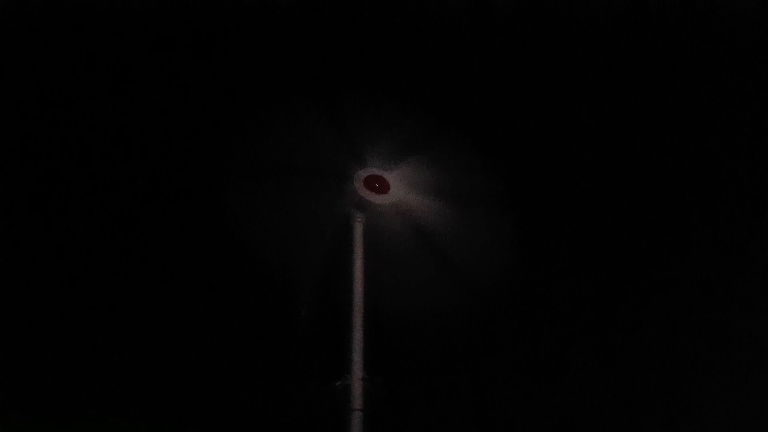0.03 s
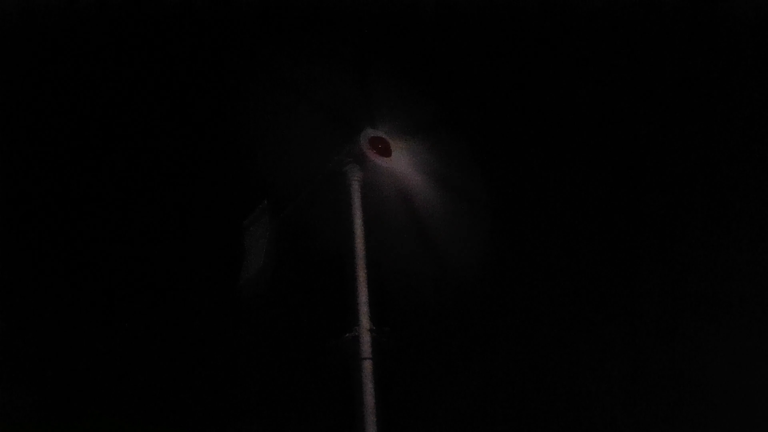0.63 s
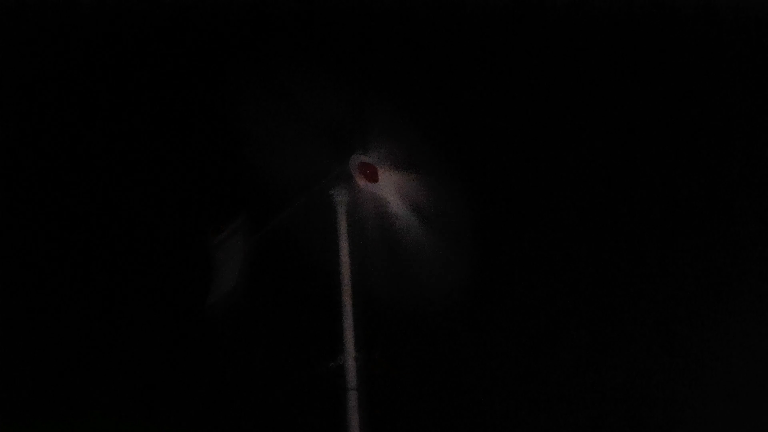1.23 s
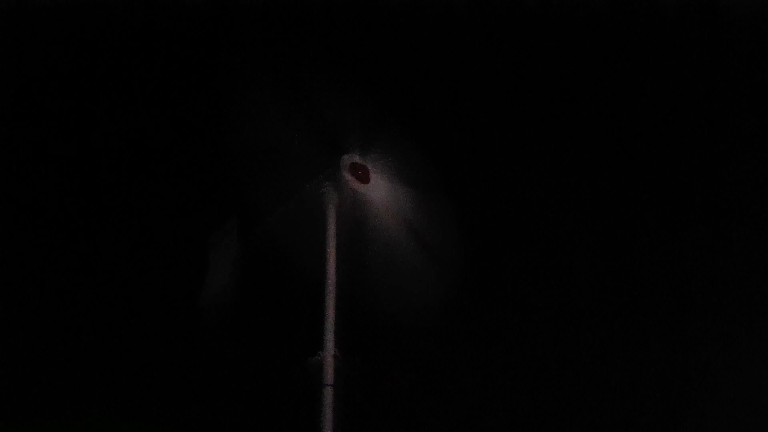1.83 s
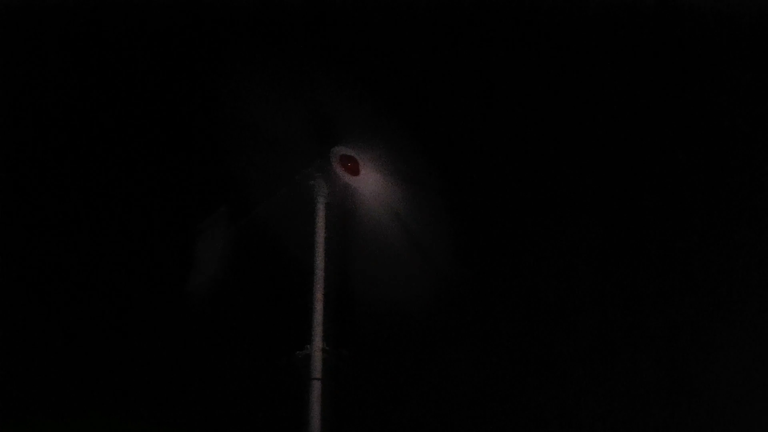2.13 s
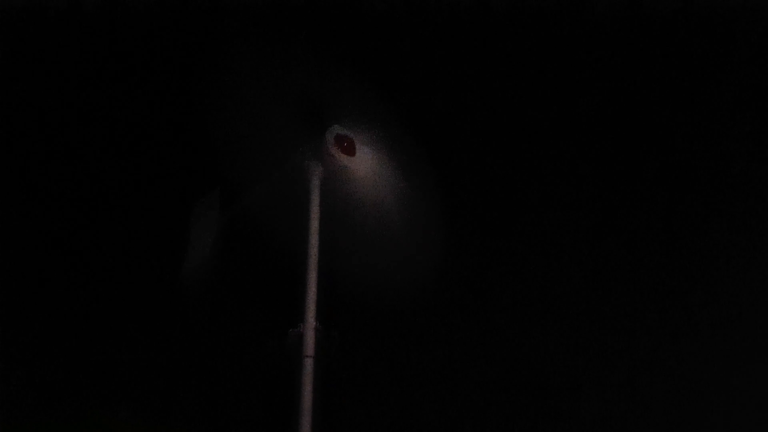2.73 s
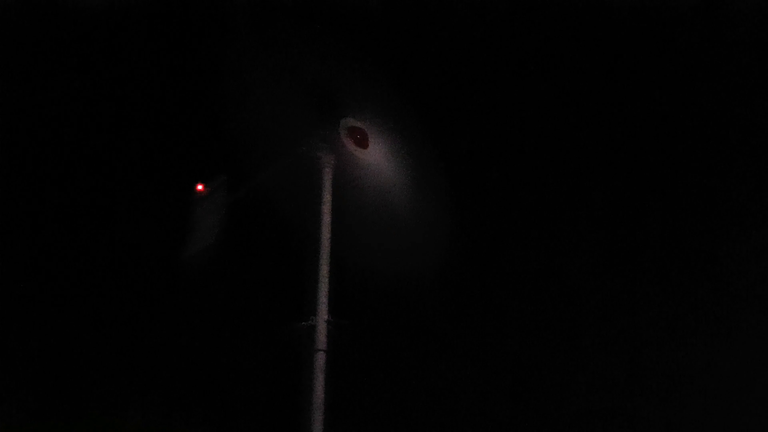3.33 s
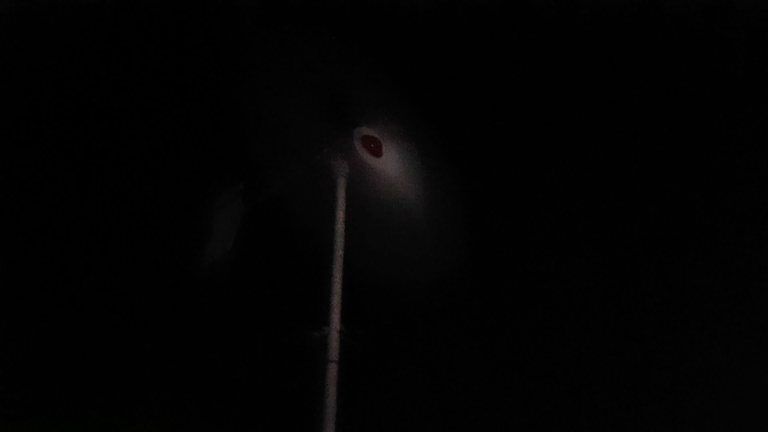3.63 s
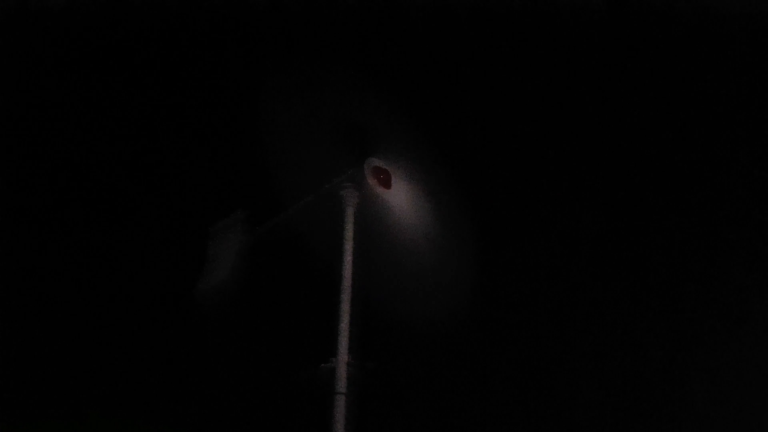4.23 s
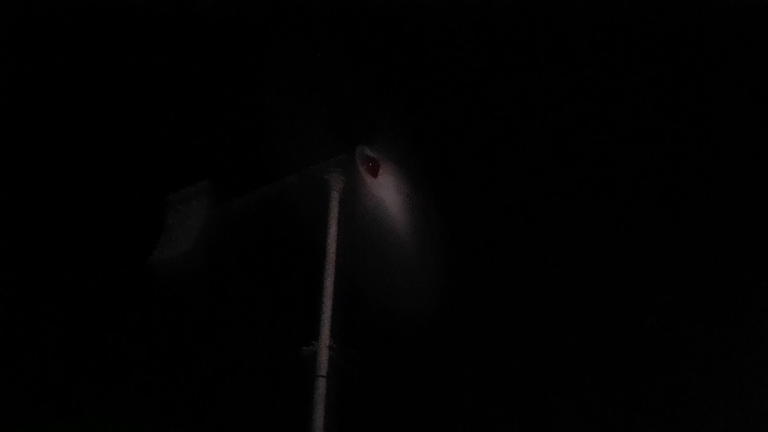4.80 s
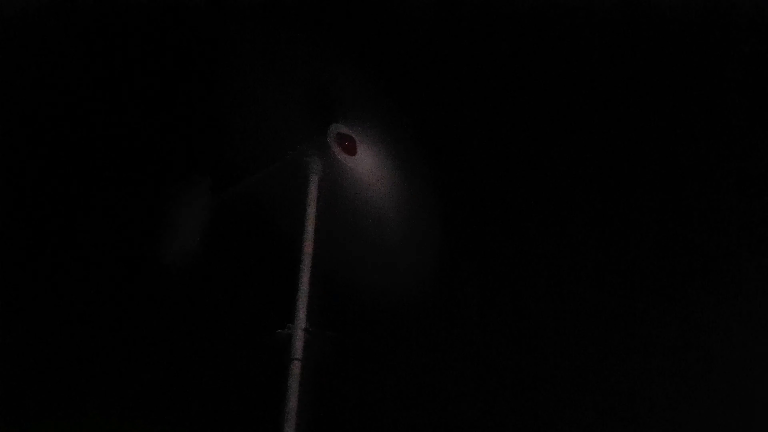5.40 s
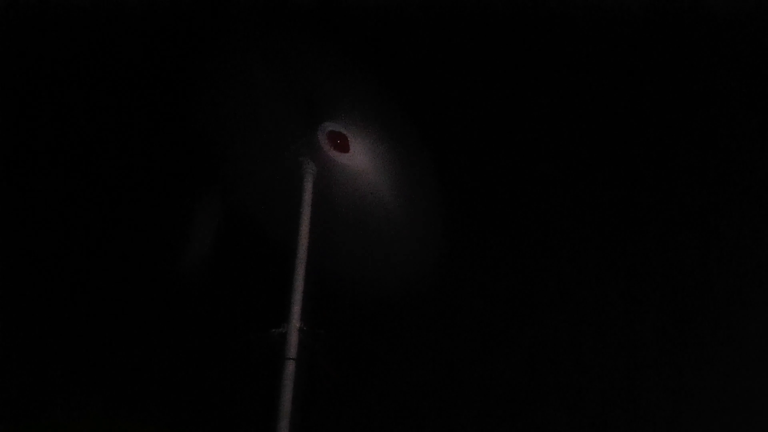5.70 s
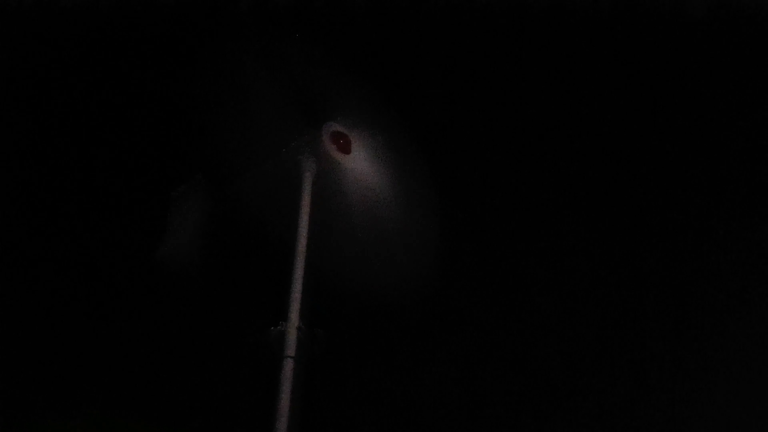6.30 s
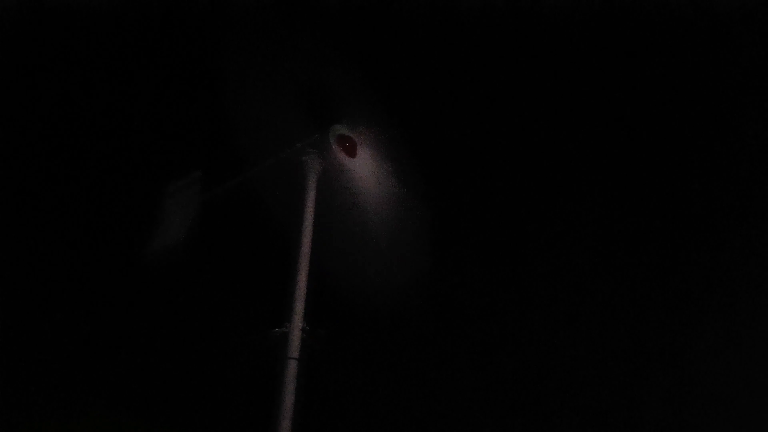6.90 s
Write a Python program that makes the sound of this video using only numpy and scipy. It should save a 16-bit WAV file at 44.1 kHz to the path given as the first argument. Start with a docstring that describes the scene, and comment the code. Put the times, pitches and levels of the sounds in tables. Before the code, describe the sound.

Gusty wind blows straight onto the microphone of a hand-held camera outdoors. It makes an uneven low rumble that flutters and crackles, broken by hollow thumps, sharp slaps and brief lulls, mostly on the right. Fingers rub, tick and bump lightly on the case near the start. The gusts keep coming and are loudest and roughest near the end, over a faint wash of distant wind.

```python
"""Under a street lamp at night, gusty wind blows over the two microphone ports of a hand-held camera.
Eddies (swirls of air) buffet each port on its own, the windward right one harder, and tear into a
crackling flutter when the flow is fast. Sharp eddies slap a port, broad ones thump hollowly, and the
air cracks and rasps at the rim. Wind also washes through the surroundings, and the hand rubs, ticks
and bumps on the case."""
import sys
import numpy as np
from scipy import signal
from scipy.io import wavfile
from scipy.ndimage import uniform_filter1d, minimum_filter1d

SR = 44100
rng = np.random.default_rng(int(sys.argv[2]) if len(sys.argv) > 2 else 0)


def wav_record(signal):
    """Record a signal, one row per channel, as 16-bit PCM in the file named by sys.argv[1]."""
    frames = np.transpose(np.atleast_2d(signal))
    bounded = np.clip(frames, -1, 1)
    # unit amplitude maps onto the largest positive 16-bit level
    quanta = np.round(bounded * 32767).astype(np.int16)
    wavfile.write(sys.argv[1], SR, quanta)


N = 306495
TIME = np.arange(N) / SR
ORDINARY_BUFFET_DB, ORDINARY_FLUTTER_DB = -19, -35   # strengths in an ordinary gust

# sharp eddies that slap a port: t/s, level/dB, f/Hz, port ("L" or "R")
SHARP_EDDIES = [(.579, -14.5, 498, "R"), (.918, -14.5, 314, "R"), (1.297, -10.5, 300, "R"),
                (1.59, -13, 345, "R"), (1.926, -7.5, 305, "R"), (2.094, -11, 422, "R"),
                (2.676, -8.5, 425, "R"), (2.693, -7, 310, "R"), (3.436, -11, 407, "R"),
                (3.696, -10.5, 330, "R"), (3.717, -12.5, 332, "R"), (3.751, -10.5, 487, "R"),
                (3.832, -14, 292, "L"), (3.913, -10, 407, "L"), (3.954, -17, 390, "R"),
                (3.981, -11, 438, "R"), (4.031, -8.5, 385, "R"), (4.248, -6.5, 390, "R"),
                (4.334, -12, 546, "R"), (4.511, -12, 640, "R"), (4.573, -10.5, 272, "R"),
                (4.586, -15, 412, "L"), (4.64, -7.5, 347, "R"), (5.044, -10.5, 310, "L"),
                (5.144, -5.5, 437, "R"), (5.211, -6, 325, "R"), (5.514, -9, 365, "R"),
                (5.564, -8, 323, "R"), (5.635, -12, 593, "R"), (5.689, -11, 437, "R"),
                (5.787, -7.5, 463, "R"), (5.851, -4.5, 537, "R"), (5.872, -7, 395, "L"),
                (5.928, -5.5, 370, "L"), (5.947, -4, 657, "R"), (6.084, -1.5, 414, "R"),
                (6.229, -12, 674, "R"), (6.242, -5.5, 373, "L"), (6.311, -9, 620, "R"),
                (6.514, -10, 358, "L"), (6.536, -13, 540, "R"), (6.578, -7, 644, "R"),
                (6.616, -9.5, 547, "R"), (6.691, -8, 392, "R"), (6.863, -8, 354, "R")]
# broad eddies that cover a port: t/s, half-length/s, level/dB, f/Hz, port
BROAD_EDDIES = [(0.431, .011, -17, 190, "R"), (.455, .007, -6.5, 350, "R"), (.479, .007, -7, 420, "L"),
                (0.505, .011, -13.5, 380.7, "R"), (1.551, .01, -7.5, 335, "R"),
                (1.619, .009, -15, 114.6, "R"), (3.934, 0.011, -12, 200, "R"), (6.063, .011, -6, 380, "R")]


def from_db(db):
    """Turn decibels into a gain."""
    return 10 ** (np.asarray(db) / 20)


def in_time(rows):
    """Join rows of (time, values...) into one curve per value column."""
    times, *columns = np.transpose(rows)
    return [np.interp(TIME, times, column) for column in columns]


def at_hz(points, hz):
    """Read a table of (frequency, value) on a log-frequency axis."""
    freqs, values = np.transpose(points)
    return np.interp(np.log(hz), np.log(freqs), values)


def bell(t, half_length):
    """A smooth hump of height 1 at time t."""
    out = np.zeros(N)
    near = slice(*np.searchsorted(TIME, [t - 4 * half_length, t + 4 * half_length]))
    out[near] = np.exp(-((TIME[near] - t) / half_length) ** 2)
    return out


def drift(rate_hz):
    """A smooth random wobble of typical size 1; a higher rate makes it quicker."""
    step = 20   # samples per random value
    pole = np.exp(-2 * np.pi * rate_hz * step / SR)
    white = rng.standard_normal(N // step + 2002)
    slow = signal.lfilter([1], [1, -2 * pole, pole * pole], white)[2000:]   # let the filter settle
    return np.interp(np.arange(N) / step, np.arange(len(slow)), slow / slow.std())


def swelling(rate_hz, swing_db):
    """A randomly swelling gain with an average power of 1."""
    gain = from_db(swing_db * 2 * np.tanh(drift(rate_hz) / 2))
    return gain / np.sqrt(np.mean(gain ** 2))


def around(noise, hz, spread):
    """Keep the band from hz / spread to hz * spread."""
    edges = [hz / spread, min(hz * spread, 18000)]
    return signal.sosfilt(signal.butter(2, edges, "band", fs=SR, output="sos"), noise)


def noise_bands(spectrum):
    """Yield (centre frequency, noise) band by band, at the spectrum's level per Hz."""
    edges = np.concatenate([np.geomspace(20, 2500, 15), np.geomspace(3400, 16500, 8)])
    white = rng.standard_normal((2, N))   # neighbouring bands use different noise
    for k, (low, high) in enumerate(zip(edges, edges[1:])):
        hz = np.sqrt(low * high)
        if spectrum[0][0] / 1.2 < hz < spectrum[-1][0] * 1.2:
            band_pass = signal.butter(2, [low, high], "band", fs=SR, output="sos")
            band = signal.sosfilt(band_pass, white[k % 2])
            level = np.sqrt(high - low) * from_db(at_hz(spectrum, hz))
            yield hz, level * band / band.std()


def hiss(spectrum):
    """Steady noise with the given spectrum."""
    return sum(band for hz, band in noise_bands(spectrum))


def airflow():
    """Wind plus gusts and lulls: strength at the right and left ports, and extra tearing, in dB."""
    # the underlying wind: t/s, right level/dB, left level/dB
    wind = [(0.0, -52, -50), (0.03, -36.5, -42.5), (0.56, -20.5, -26.5), (1.15, -22.5, -31),
            (1.8, -21, -32), (2.16, -19.5, -22.5), (2.34, -23.5, -40), (2.89, -22, -31.5),
            (3.55, -21.5, -28), (4.45, -27.5, -22), (4.75, -24.5, -24.5), (4.93, -33, -34.5),
            (5.06, -20, -22.5), (5.79, -15, -22.5), (5.94, -14, -17.5), (6.31, -11.5, -21.5),
            (6.43, -14.5, -19.5), (6.95, -16, -24)]
    # gusts on top of it: t/s, half-length/s, right surge/dB, left surge/dB, extra tearing/dB
    gusts = [(0.137, 0.1, 8, 7.5, -1), (0.353, 0.022, 4.5, 8.5, -6), (0.431, 0.037, 9.5, 9.5, 2.5),
             (0.496, 0.032, 6.5, -0.5, 1.5), (0.76, 0.089, 0, -1, -3.5), (0.977, 0.07, 1.5, 3.5, -8),
             (1.271, 0.052, 4.5, 4, -1.5), (1.59, 0.047, 6, 7.5, -5), (1.494, 0.079, 2.5, 5, -3.5),
             (1.984, 0.096, 2, -1, 1), (2.259, 0.031, 2, 3, 4.5), (2.373, 0.048, 1.5, 5, 6),
             (2.586, 0.15, 3.5, 6.5, 2.5), (2.894, 0.031, 0.5, 7.5, -5), (3.041, 0.02, 2, 2, -5),
             (3.408, 0.042, 1, 2, 4), (3.488, 0.016, 1.5, -2, 5.5), (3.703, 0.025, 9, 2, 3.5),
             (3.786, 0.025, 3.5, 6, -15), (3.945, 0.029, 13.5, 4.5, -6.5), (4.031, 0.022, 9.5, 1.5, 4.5),
             (4.109, 0.013, 10, 1, -14), (4.267, 0.062, 5, -1.5, 3), (4.395, 0.063, 8, -3, -0.5),
             (4.547, 0.11, 7, -2.5, 1), (4.675, 0.053, 4.5, -1, 2.5), (5.211, 0.033, 6, 2, -1.5),
             (5.534, 0.037, 4, 3.5, -4), (6.208, 0.021, 1.5, 3, 2), (6.601, 0.025, 3.5, 1.5, -2.5),
             (6.706, 0.021, 4, -1.5, -2), (6.856, 0.02, 5.5, 2, -6.5)]
    # brief lulls at both ports: t/s, half-length/s, dip/dB
    lulls = [(0.079, 0.0076, -25), (0.222, 0.024, -13), (0.375, 0.017, -8), (0.474, .004, -4.5),
             (.645, 0.049, -4.5), (0.9, 0.0076, -9), (1.09, 0.066, -3.5), (1.395, 0.06, -5.5),
             (1.733, 0.06, -4), (2.079, 0.008, -7), (2.465, 0.022, -6.5), (2.917, 0.06, -4.5),
             (2.991, 0.0067, -7), (3.085, 0.017, -5), (3.188, 0.027, -7.5), (3.295, 0.019, -8.5),
             (3.567, 0.027, -4.5), (3.88, 0.018, -1.5), (3.969, 0.0073, -5.5), (4.01, 0.0063, -5),
             (4.08, 0.018, -2.5), (4.137, 0.0096, -8.5), (4.321, 0.0067, -9), (4.62, 0.0095, -5.5),
             (4.798, 0.0074, -8), (5.024, 0.0065, -16), (5.104, .02, -3), (5.417, 0.011, -7),
             (5.673, 0.0054, -17), (5.78, 0.0086, -4.5), (5.81, 0.0087, -4.5), (6.372, 0.022, -3),
             (6.446, .012, -4.5), (6.651, 0.023, -2.5), (6.807, 0.016, -3)]
    squareness = 6.5   # 2 is a bell; more gives steeper sides and a flatter top
    right_db, left_db = in_time(wind)
    tear_db = np.zeros(N)
    for t, half_length, right_surge, left_surge, tearing in gusts:
        shape = np.exp(-np.minimum(np.abs(TIME - t) / half_length, 4) ** squareness)
        right_db += right_surge * shape
        left_db += left_surge * shape
        tear_db += tearing * shape
    lull_db = sum(dip * bell(t, half_length) for t, half_length, dip in lulls)
    return right_db + lull_db, left_db + lull_db, tear_db


def turbulence(spectrum, growth, drive_db, eddies, span_s):
    """Pressure of passing eddies: each band grows at its own rate as the flow drives it harder."""
    bands = list(noise_bands(spectrum))
    # even out swells slower than span_s, so that there the flow alone sets the strength
    swirling = eddies * sum(band for hz, band in bands)
    power = uniform_filter1d(swirling ** 2, int(span_s * SR) + 1)
    levelling = np.sqrt(sum(band.var() for hz, band in bands) / (power + 1e-14))
    driven = sum(band * from_db(at_hz(growth, hz) * drive_db) for hz, band in bands)
    return eddies * levelling * driven


def buffet_and_flutter(buffet_db, flutter_db):
    """Large eddies rumble at a port and shed small ones in short crackling bursts."""
    # rumble and flutter in an ordinary gust: f/Hz, level/dB per Hz
    buffet_spectrum = [(22, -55), (35, -60), (60, -46.5), (100, -44), (150, -45), (210, -46.5),
                       (290, -44.5), (390, -44.5), (600, -59), (900, -76.5), (1500, -89), (3000, -100)]
    flutter_spectrum = [(350, -64), (600, -56), (950, -70.5), (1300, -71), (1900, -72.5), (2500, -86),
                        (3300, -76.5), (4500, -114), (7000, -102), (12000, -112)]
    # how each band follows the flow: f/Hz, growth/dB per dB
    buffet_growth = [(30, 0.6), (100, 0.75), (200, 0.91), (370, 1.24), (600, 2), (1200, 2)]
    flutter_growth = [(500, 0.97), (950, 1.23), (2000, 0.81), (3200, 0.48), (6000, 0.36)]
    # weight that the widest eddies give the deep bass: t/s, gain/dB
    bass_weight = [(0, -8), (.8, -3.5), (1.25, 3.5), (1.53, -1), (1.7, -0.5), (2.2, -5), (3.6, 1), (5.1, 1),
                   (5.9, 3.5), (6.95, -8)]
    eddies = swelling(rate_hz=42.3, swing_db=3.0)
    bursts = eddies * swelling(rate_hz=280, swing_db=5.7)
    buffet_drive = buffet_db - ORDINARY_BUFFET_DB
    flutter_drive = flutter_db - ORDINARY_FLUTTER_DB
    buffet = turbulence(buffet_spectrum, buffet_growth, buffet_drive, eddies, span_s=0.075)
    flutter = turbulence(flutter_spectrum, flutter_growth, flutter_drive, bursts, span_s=0.063)
    bass_db, = in_time(bass_weight)
    bass = signal.sosfilt(signal.butter(1, 110, fs=SR, output="sos"), buffet)
    return buffet + (from_db(bass_db) - 1) * bass + flutter


def sheltered_port(wind_db):
    """The left port is out of the direct wind, so the flow tears only in the strongest gusts."""
    brighten_db = 8.0   # drive the eddies harder for a brighter tone, then turn them down
    flow_db = wind_db + brighten_db
    flutter_db = ORDINARY_FLUTTER_DB - 12 + 2.5 * (flow_db - ORDINARY_BUFFET_DB)
    wind = from_db(-brighten_db) * buffet_and_flutter(flow_db, flutter_db)
    return wind * slackening("L") + slaps("L") + hollow_thumps("L")


def windward_port(wind_db, tear_db):
    """The right port faces the wind: flutter grows faster than rumble, and the rim rasps and cracks."""
    flutter_db = ORDINARY_FLUTTER_DB + 3.5 + 1.43 * (wind_db - ORDINARY_BUFFET_DB) + tear_db
    wind = buffet_and_flutter(wind_db, flutter_db) * slackening("R")
    return wind + slaps("R") + hollow_thumps("R") + rim_rasp(flutter_db, tear_db) + rim_cracks()


def surroundings():
    """Far wind makes a smooth wash, partly alike at both ports, with a thin hiss on top."""
    # the far wash, and the hiss lifted by the hollows of the ports: f/Hz, relative level/dB per Hz
    wash_spectrum = [(100, -56), (600, -36.5), (1100, -38), (1800, -37), (2600, -47.5), (4000, -52),
                     (6000, -55.5), (9000, -60), (15000, -64.5)]
    air_spectrum = [(4000, -60), (7000, -55), (9500, -76), (12000, -53.5), (14000, -59), (16000, -60)]
    # how alike the wash is left and right: f/Hz, likeness (1 = the same, 0 = unrelated)
    likeness = [(200, 0.34), (1000, 0.23), (2000, 0.097), (3500, 0.11), (6000, -0.014)]
    # slow rise and fall of both sounds: t/s, gain/dB
    swell = [(0.0, -37), (1.45, -38.5), (3.0, -35.5), (4.6, -37), (6.95, -33)]
    wash = 0
    for (hz, common), (_, opposed) in zip(noise_bands(wash_spectrum), noise_bands(wash_spectrum)):
        alike = at_hz(likeness, hz)
        wash = wash + np.sqrt((1 + alike) / 2) * common
        wash = wash + np.sqrt((1 - alike) / 2) * opposed * [[1], [-1]]
    air = np.array([hiss(air_spectrum), from_db(-9.0) * hiss(air_spectrum)])
    swell_db, = in_time(swell)
    return from_db(swell_db) * (wash + air)


def crackle(per_s, spread_db, decay_s, smooth_share):
    """A gain that leaps in tiny random bursts, with an average power of 1."""
    sizes = from_db(spread_db * np.minimum(rng.exponential(1, N), 3))
    kicks = sizes * (rng.random(N) < per_s / SR)
    power = signal.lfilter([1], [1, -np.exp(-1 / (decay_s * SR))], kicks + 1e-9) ** 2
    return np.sqrt(smooth_share + (1 - smooth_share) * power / power.mean())


def rim_rasp(flutter_db, tear_db):
    """Tiny swirls shed from the rim hiss and crackle, along with the flutter and in spurts."""
    # the rasp in strong flutter, before extra tearing: t/s, level/dB
    full_rasp = [(0, -54), (1.2, -61), (1.6, -45), (1.9, -41.5), (2.3, -44.5), (2.7, -41), (3.45, -44),
                 (4.0, -44.5), (4.4, -43), (5.3, -43), (5.8, -53), (6.15, -63), (6.5, -45), (6.95, -42.5)]
    # the fastest air tearing over the rim: t/s, half-length/s, level/dB, f/Hz
    spurts = [(0.421, .009, -21, 1180), (0.482, 0.0058, -20, 900), (0.884, 0.015, -35.5, 1780),
              (1.298, 0.0067, -36, 2700), (1.506, 0.053, -48, 2680), (1.75, 0.19, -50.5, 3080),
              (3.417, 0.02, -32, 1900), (2.02, 0.04, -52, 3400), (2.283, 0.035, -50, 3300),
              (2.602, 0.062, -54, 3300), (3.708, 0.011, -34, 2040), (4.019, 0.015, -35, 2200),
              (5.24, 0.041, -50, 4440), (5.852, 0.048, -40.5, 5250), (6.136, 0.06, -47.5, 6500),
              (6.202, 0.017, -41, 9500), (6.1, 0.19, -30.5, 900), (6.226, 0.14, -43, 1910),
              (6.296, 0.035, -46, 5600), (6.35, 0.31, -50, 5040), (6.89, 0.06, -44, 5370)]
    rasp_hz, strong_flutter_db = 3300, -25.5
    full_db, = in_time(full_rasp)
    fade_db = 1.2 * np.minimum(flutter_db - strong_flutter_db, 0)
    rasp_gain = from_db(full_db + fade_db + 0.62 * tear_db) * swelling(rate_hz=34, swing_db=6.0)
    white = rng.standard_normal(N)
    rasp = around(white, rasp_hz, spread=1.23)
    out = rasp_gain * rasp / rasp.std()
    for t, half_length, db, hz in spurts:
        spurt = around(white, hz, spread=1.31)
        out += from_db(db) * bell(t, half_length) * spurt / spurt.std()
    return out * crackle(per_s=260, spread_db=0.6, decay_s=0.001, smooth_share=0.38)


def fingers(tick_decay_s, right_db):
    """Skin rubs over the case and makes it tick, nearer to the left port."""
    # skin sliding on the case: t/s, length/s, gain/dB
    rubs = [(.16, 0.044, -53), (.42, 0.05, -43.5), (.465, 0.018, -40.5), (.52, 0.062, -45),
            (.725, 0.022, -43), (.765, 0.027, -42.5), (.955, 0.034, -47), (1.058, 0.027, -41),
            (1.305, 0.022, -47)]
    # the hiss of sliding skin: f/Hz, relative level/dB per Hz
    rub_spectrum = [(800, -31), (2000, -32.5), (4000, -39), (7000, -45), (9500, -43.5), (12500, -38.5),
                    (15500, -42)]
    # dry ticks of the case: t/s, left peak level/dB, f/Hz, spread (ratio to each side)
    ticks = [(0.319, -25.5, 3300, 2.4), (1.474, -31, 13100, 1.1), (1.4865, -34, 12500, 1.2)]
    sliding = sum(from_db(db) * bell(t, length / np.sqrt(2)) for t, length, db in rubs)
    out = sliding * np.array([hiss(rub_spectrum), hiss(rub_spectrum)])
    age = TIME[:SR // 20]
    for t, db, hz, spread in ticks:
        burst = rng.standard_normal((2, len(age))) * np.exp(-age / tick_decay_s)
        tick = around(burst, hz, spread)
        start = round(t * SR)
        out[:, start:start + len(age)] += from_db(db) * tick / np.abs(tick).max(axis=1, keepdims=True)
    return out * from_db([[0], [right_db]])


def slackening(side):
    """A gain: the flow at a port weakens while a broad eddy covers it and just before each slap."""
    depth_db, lead_s = -7.5, 0.004
    covered = sum(bell(t, half_length) for t, half_length, _, _, port in BROAD_EDDIES if port == side)
    ahead = sum(bell(t - lead_s, half_length=0.008) for t, _, _, port in SHARP_EDDIES if port == side)
    return from_db(depth_db * (covered + ahead))


def hollow_thumps(side):
    """A broad eddy keeps the air in the port ringing for a few cycles, rising in pitch as it passes."""
    rise_octaves_per_s, wander_octaves = 32, 0.1
    wander = wander_octaves * drift(rate_hz=129)
    out = np.zeros(N)
    for t, half_length, db, hz, port in BROAD_EDDIES:
        if port == side:
            octaves = rise_octaves_per_s * np.clip(TIME - t, -half_length, half_length) + wander
            phase = 2 * np.pi * np.cumsum(hz * 2 ** octaves) / SR
            out += from_db(db) * bell(t, half_length) * np.sin(phase)
    return out


def rim_cracks(decay_s=0.0005):
    """The flow snaps off the rim in dry cracks of about a millisecond."""
    # cracks at the right port: t/s, peak level/dB, f/Hz
    cracks = [(.445, -16.5, 2280), (0.581, -28, 2700), (1.925, -29, 3000), (1.993, -22.5, 2700),
              (2.036, -24, 3500), (2.26, -26, 3100), (2.282, -26, 4000), (2.289, -29, 4070),
              (2.342, -29, 2900), (2.525, -24.5, 3020), (2.596, -27, 3970), (2.66, -26, 3200),
              (2.821, -24, 2310), (3.471, -18, 1700), (3.754, -26, 1700), (3.956, -20, 2100),
              (5.317, -22, 2300), (5.338, -18, 2300), (5.383, -19, 1990), (5.826, -18.5, 2760),
              (6.494, -23, 5200), (6.556, -22, 2800), (6.848, -24, 3800)]
    out, age = np.zeros(N), TIME[:SR // 100]
    for t, db, hz in cracks:
        burst = rng.standard_normal(len(age)) * np.exp(-age / decay_s)
        snap = around(burst, hz, spread=1.37)
        start = round(t * SR)
        out[start:start + len(age)] += from_db(db) * snap / np.abs(snap).max()
    return out


def case_bumps(contact_hz):
    """Soft jolts from the hand set the case ringing; a lower contact_hz makes them duller."""
    # jolts on the case: t/s, push level/dB, left minus right/dB
    jolts = [(0.4745, 5, -9), (0.4844, -0.5, 3), (6.578, -4, 0)]
    # the tones the case rings at: f/Hz, gain/dB, time to fade by 60 dB/s
    case_tones = [(450, -4, 0.03), (239, -30, 0.017), (1030, -36, .025)]
    pushes, out = np.zeros((2, N)), np.zeros((2, N))
    for t, db, pan_db in jolts:
        pushes[:, round(t * SR)] = from_db([db + pan_db / 2, db - pan_db / 2])
    softened = signal.sosfilt(signal.butter(2, contact_hz, fs=SR, output="sos"), pushes + 1e-18)
    for hz, db, ring_s in case_tones:
        decay = from_db(-60 / (ring_s * SR))
        angle = 2 * np.pi * hz / SR
        ring = signal.lfilter([0, np.sin(angle)], [1, -2 * decay * np.cos(angle), decay ** 2], softened)
        out += from_db(db) * ring
    return out


def slaps(side):
    """A sharp eddy rings the air in the port for a few falling cycles, with a puff of torn air."""
    rise_s, pitch_halving_s = 0.0022, 0.057
    tear_db, tear_hz = -18, 805
    out, age = np.zeros(N), TIME[:SR // 20]
    shape = age / rise_s * np.exp(1 - age / rise_s)
    for t, db, hz, port in SHARP_EDDIES:
        tear = around(rng.standard_normal(len(age)), tear_hz, spread=1.6)
        if port == side:
            ring = np.sin(2 * np.pi * hz * pitch_halving_s * np.log1p(age / pitch_halving_s))
            slap = shape * (ring + from_db(tear_db) * tear / tear.std())
            start = round(t * SR)
            out[start:start + len(age)] += from_db(db) * slap
    return out


def scene():
    """Wind on the ports, wind all around, and the hand on the case."""
    right_db, left_db, tear_db = airflow()
    ports = np.array([sheltered_port(left_db), windward_port(right_db, tear_db)])
    far_wind = surroundings()
    hand = fingers(tick_decay_s=0.00099, right_db=-3.0) + case_bumps(contact_hz=905)
    return ports + far_wind + hand


def record(dry):
    """A fast limiter turns each channel down around its highest peaks; the top treble is cut."""
    ceiling, cutoff_hz = 0.93, 15650
    span = SR // 200   # 5 ms
    allowed_gain = np.minimum(1, ceiling / (np.abs(dry) + 1e-9))
    held_gain = minimum_filter1d(allowed_gain, span, axis=1)
    limited = dry * uniform_filter1d(held_gain, span, axis=1)
    return signal.sosfilt(signal.ellip(14, .1, 80, cutoff_hz, fs=SR, output="sos"), limited)


dry = scene()
out = record(dry)
wav_record(out)
```